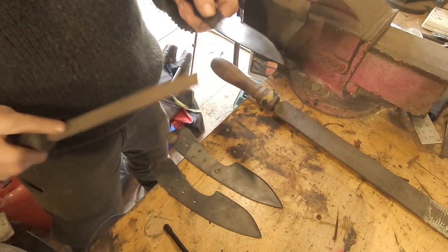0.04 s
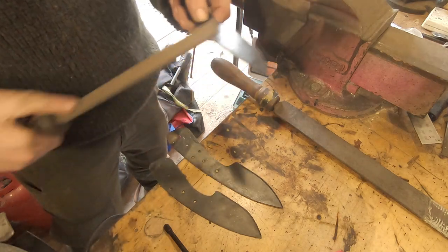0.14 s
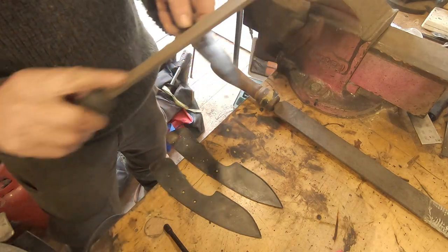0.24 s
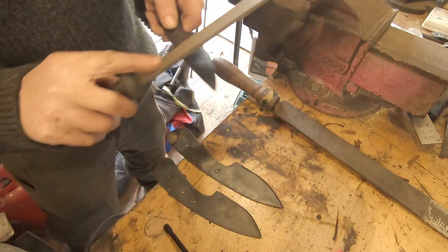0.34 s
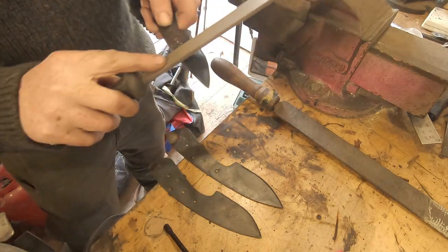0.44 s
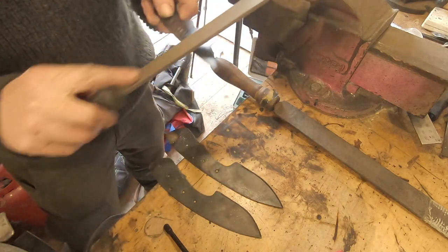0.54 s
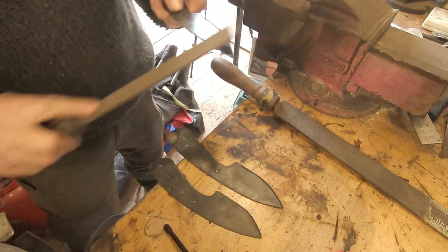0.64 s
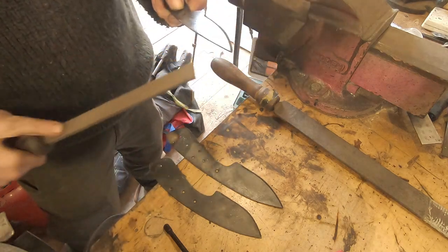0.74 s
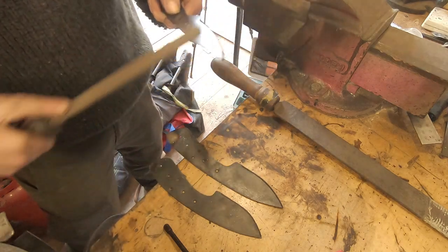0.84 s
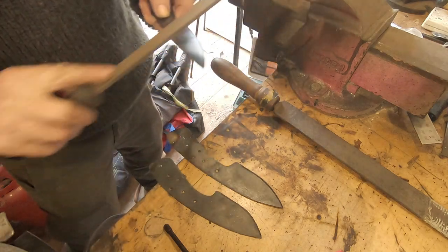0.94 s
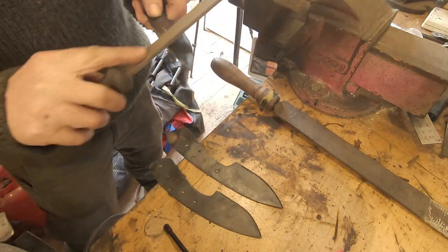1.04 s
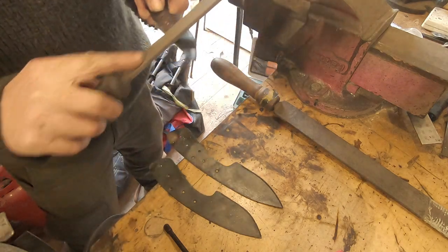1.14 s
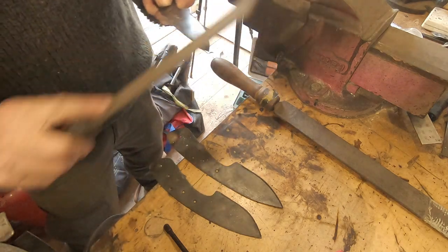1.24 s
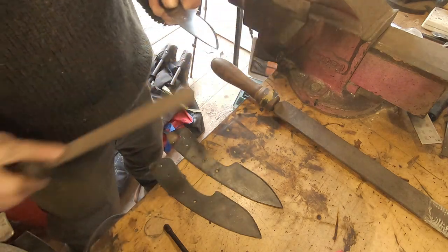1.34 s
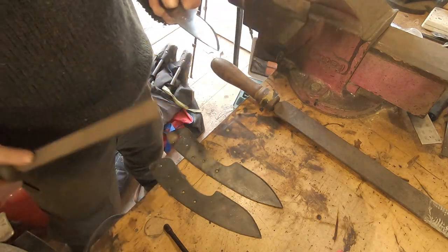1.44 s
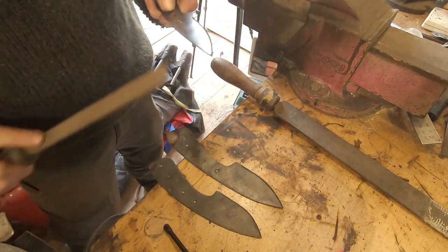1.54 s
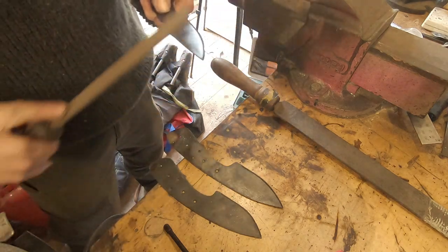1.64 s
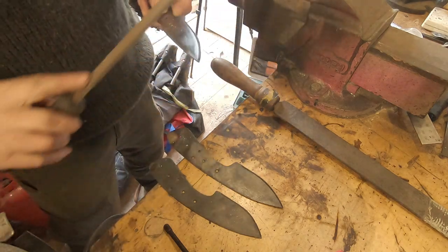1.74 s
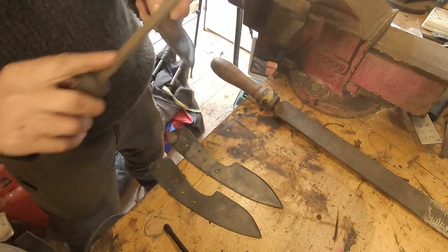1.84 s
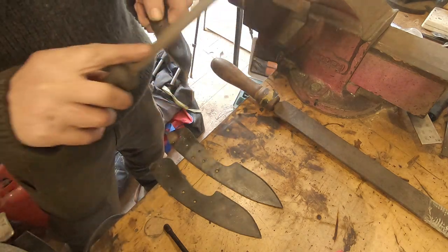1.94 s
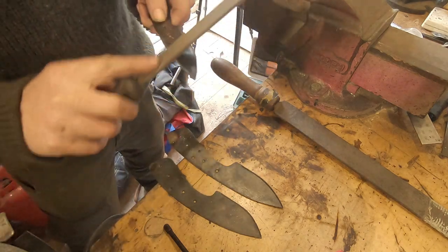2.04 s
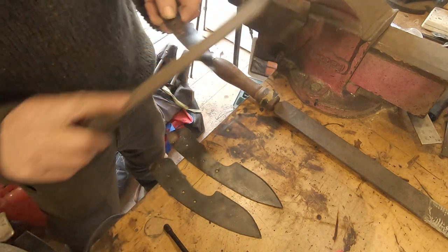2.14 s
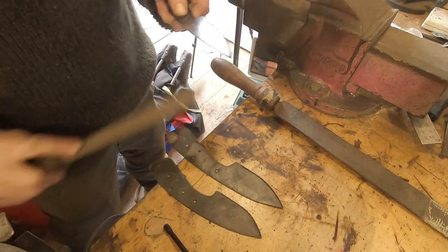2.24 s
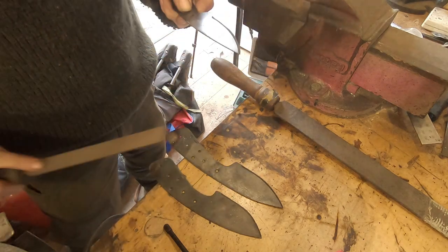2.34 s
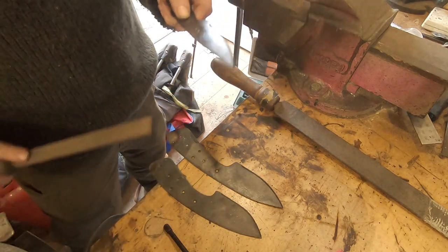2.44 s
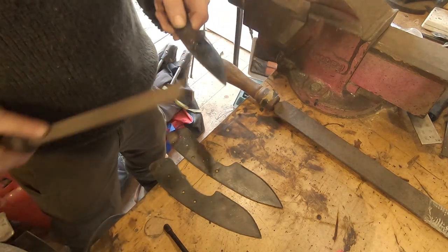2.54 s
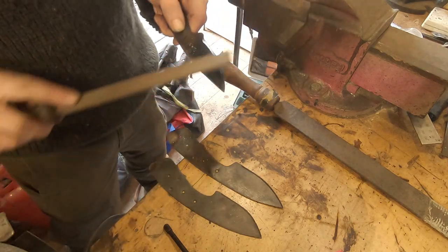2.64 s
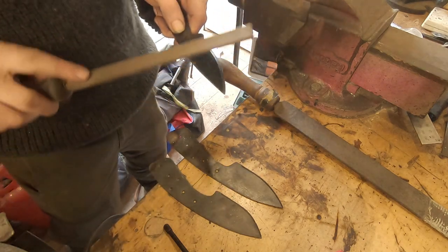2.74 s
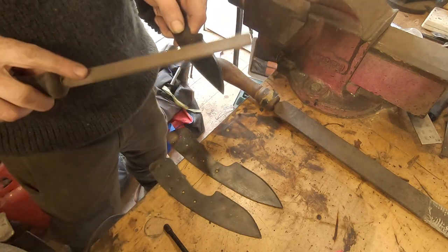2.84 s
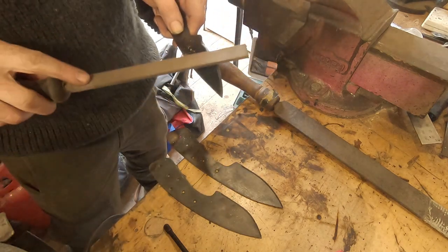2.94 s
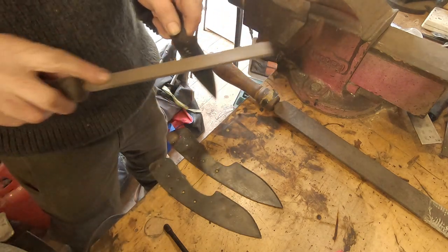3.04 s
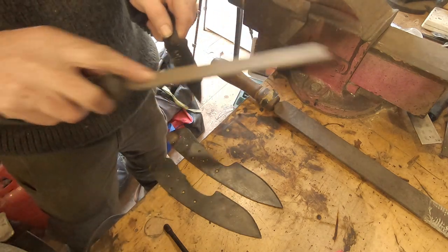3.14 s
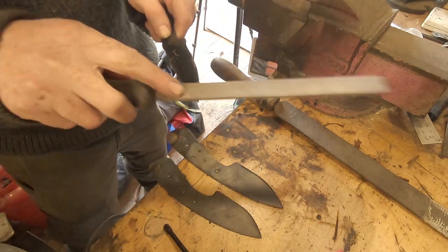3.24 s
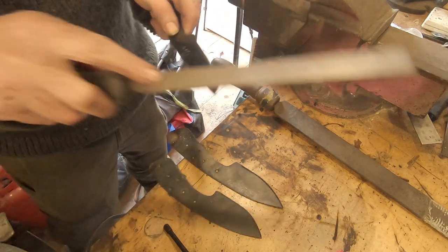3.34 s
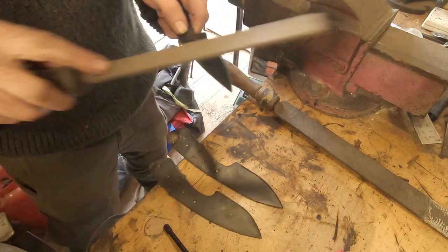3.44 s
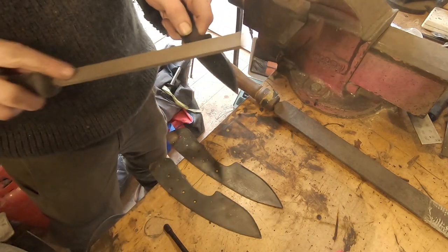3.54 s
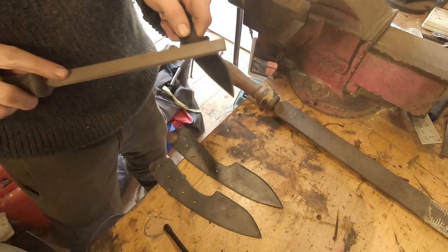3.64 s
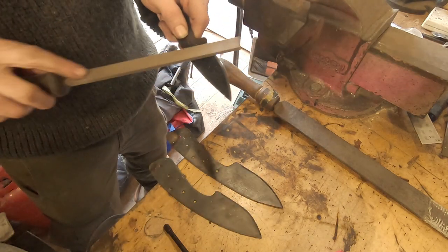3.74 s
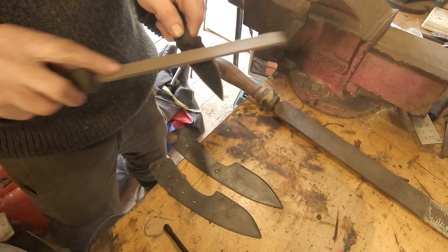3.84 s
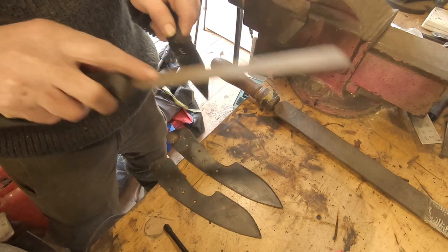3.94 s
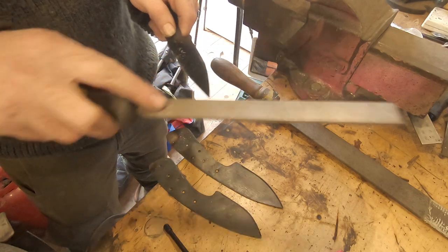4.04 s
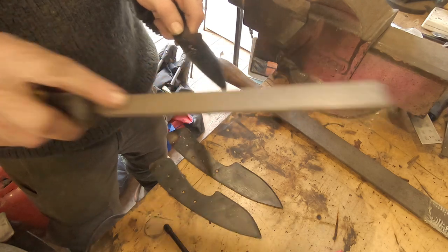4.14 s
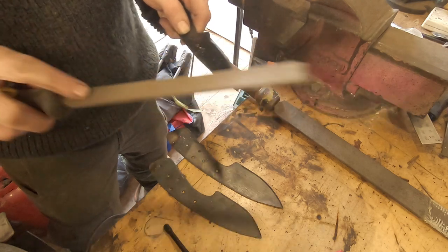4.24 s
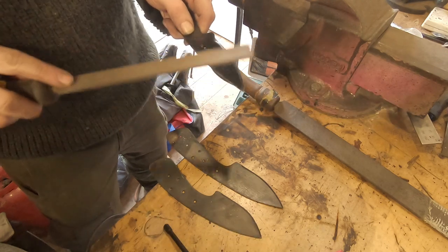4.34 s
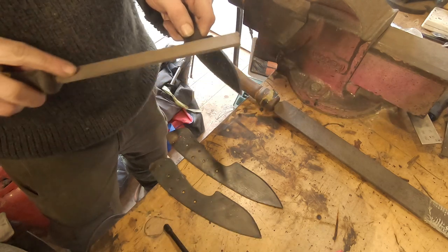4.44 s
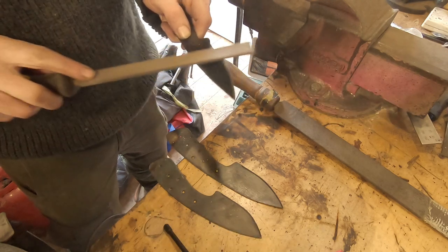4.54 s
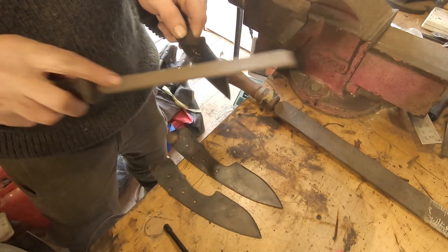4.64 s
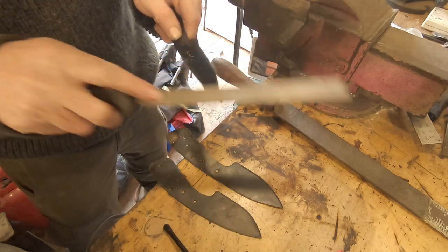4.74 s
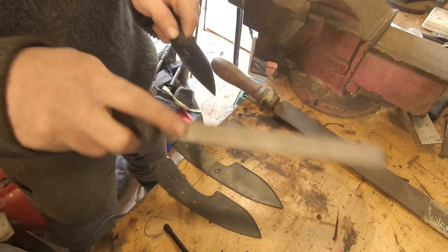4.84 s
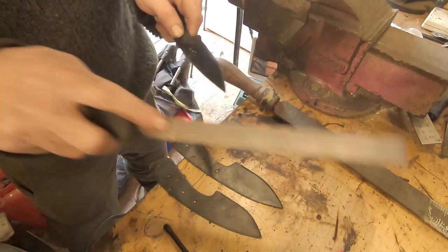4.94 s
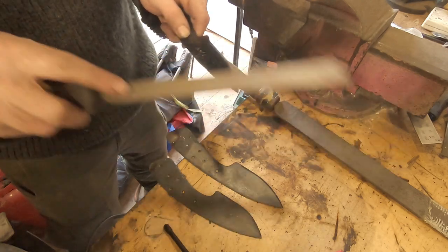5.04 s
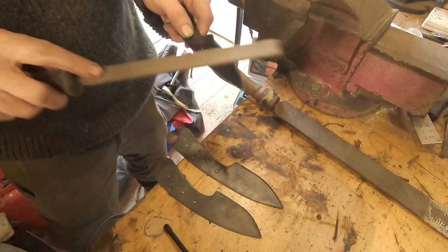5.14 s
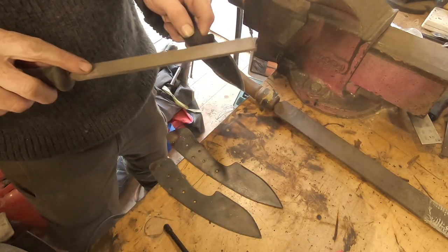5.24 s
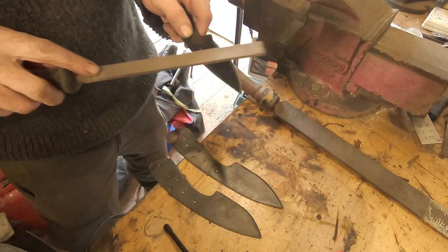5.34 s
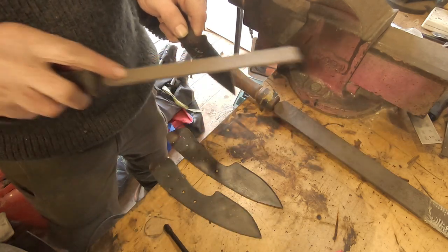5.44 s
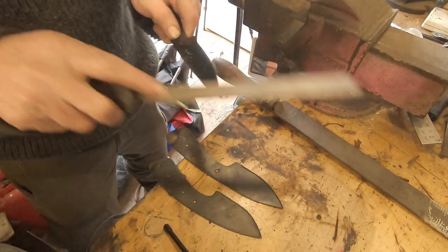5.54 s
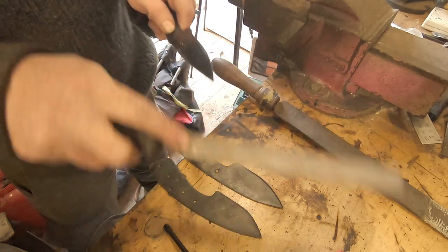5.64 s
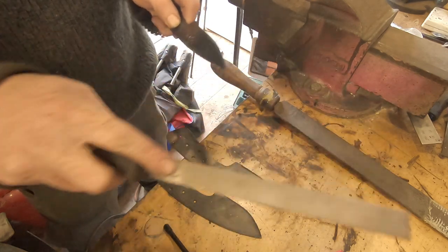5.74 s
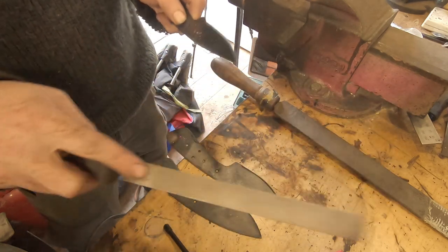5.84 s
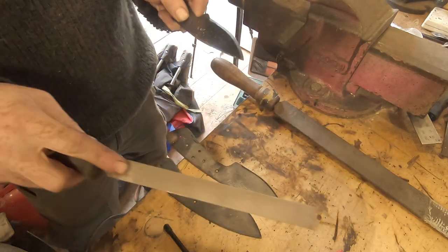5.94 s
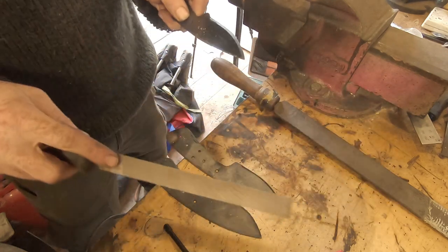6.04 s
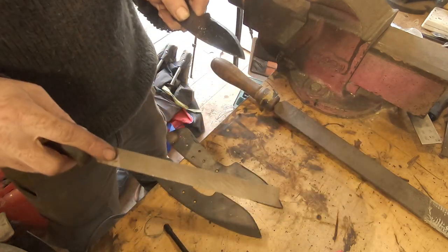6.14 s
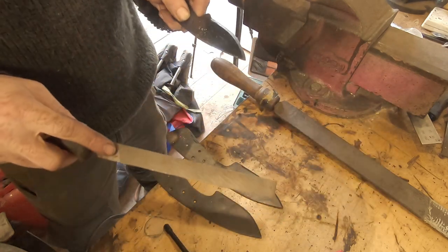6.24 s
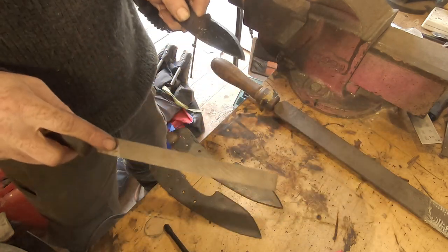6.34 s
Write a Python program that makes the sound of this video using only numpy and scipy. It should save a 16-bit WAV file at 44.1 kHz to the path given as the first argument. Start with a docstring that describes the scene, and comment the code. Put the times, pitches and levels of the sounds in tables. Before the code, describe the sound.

Short, ringing scrapes of a file on hard steel repeat steadily, most beginning with a tick, over a faint workshop hum.

```python
"""Filing a steel blade

A hand file is pushed seven times across a hard blade held over a workbench. It lands with a tick,
gathers speed and lifts off; its teeth chatter and snag, driving the steel's modes in forced vibration.
After three pushes the blade is turned and sounds darker. A small, dry workshop hums quietly behind."""
import sys
import numpy as np
from scipy import signal
from scipy.fft import rfft, irfft, next_fast_len
from scipy.io import wavfile
from scipy.ndimage import uniform_filter1d

SR = 44100
rng = np.random.default_rng(int(sys.argv[2]) if len(sys.argv) > 2 else 0)


def store_wav(level_fs):
    """Save 16-bit WAV to argv[1]."""
    pcm = np.round(np.clip(np.atleast_2d(level_fs), -1, 1) * 32767)
    wavfile.write(sys.argv[1], SR, pcm.T.astype(np.int16))


N = 281247
TURN_S = 2.6  # the blade is turned over
TAPS = 8192
GRID = np.fft.rfftfreq(TAPS, 1 / SR)  # f/Hz on which responses are drawn


def gain_of(db):
    """Amplitude ratio of a level in decibels."""
    return 10 ** (np.asarray(db) / 20)


def unit_rms(x):
    """Normalisation to unit mean power."""
    return x / np.sqrt(np.mean(x ** 2) + 1e-20)


def curve_at(points, hz):
    """Interpolation of (f/Hz, value) points on a logarithmic frequency axis."""
    f, value = np.transpose(points)
    return np.interp(np.log(hz + 1), np.log(f + 1), value)


def ramp(t, start, end):
    """Linear rise from 0 at start to 1 at end."""
    return np.clip((t - start) / max(end - start, 1e-4), 0, 1)


def add(mix, s, sound):
    """Superposition: the sound joins the mix at s seconds."""
    part = mix[max(round(s * SR), 0):][:len(sound)]
    part += sound[:len(part)]


def wander(length, hz):
    """Random modulation: noise of about unit rms, low-passed at hz."""
    f = np.fft.rfftfreq(N, 1 / SR)
    spectrum = rfft(rng.standard_normal(N)) / (1 + (f / hz) ** 4)
    return unit_rms(irfft(spectrum, N))[:length]


def minimum_phase(gain):
    """Minimum-phase impulse response of a gain curve on GRID, its peak gain scaled to 1."""
    log_gain = np.log(np.maximum(gain / gain.max(), 1e-5))
    mirrored = np.concatenate([log_gain, log_gain[-2:0:-1]])
    spectrum = np.exp(np.conj(signal.hilbert(mirrored)))
    return irfft(spectrum[:len(GRID)])[:TAPS // 2]


def through(x, response):
    """Convolution, cut to the length of the input."""
    return signal.fftconvolve(x, response)[:len(x)]


def split(x):
    """Complementary crossover: the ring below 4 kHz and the bite above."""
    x = np.pad(x, (40, 0))
    ring = signal.sosfiltfilt(signal.butter(4, 4000, fs=SR, output="sos"), x, padtype=None)
    return ring, x - ring


def background(level_db=-68, side_db=-8, swell_db=1):
    """Ambient noise: a low murmur with faint hiss, largely coherent between left and right."""
    # f/Hz, relative spectral density/dB
    noise_floor = [(12, -38.5), (20, -8), (40, -11.5), (112, -26), (144, -6), (207, -2.5), (324, -13),
                   (372, -15.5), (581, -21), (686, -15.5), (932, -19), (1040, -24.5), (1230, -21),
                   (2330, -33), (15500, -46)]
    colour = gain_of(curve_at(noise_floor, np.fft.rfftfreq(N, 1 / SR)))
    mid, side = unit_rms(irfft(rfft(rng.standard_normal((2, N))) * colour, N))
    side = side * gain_of(side_db)
    return np.array([mid + side, mid - side]) * gain_of(level_db + swell_db * wander(N, 4))


def tooth_rate(t, fastest, lift, top_hz, lift_hz, start_hz=1095):
    """Tooth-passing frequency follows the arm's speed: a late rise to top_hz, then a glide to lift_hz."""
    rising = np.sin(np.pi / 2 * ramp(t, t[0], fastest)) ** 3
    braking = ramp(t, fastest, lift) ** 1.5
    return (start_hz + (top_hz - start_hz) * rising) * (lift_hz / top_hz) ** braking


def snags(t):
    """Unsteady friction: each grab of the teeth shifts ring, bite and chatter by a Gaussian pulse in dB."""
    # t/s, duration/s, ring/dB, bite/dB, chatter/dB
    grabs = [(0.622, 0.037, -1.5, 3.5, 5), (0.666, 0.024, 2.5, 1, -1), (0.728, 0.015, 1, -2.5, 8.5),
             (1.223, 0.017, -1, 3.5, 0.5), (1.246, 0.013, 3, -1.5, 14), (2.136, 0.025, -0.5, 1, 1),
             (2.2, .030, -1, 1, 8.5), (2.252, 0.013, 8, -0.5, -0.5), (3.837, 0.044, 2.5, -3.5, 13.5),
             (3.979, 0.0084, 3.5, 4, 6.5), (4.022, 0.0146, -8, 14.5, 0), (4.719, .030, -0.5, -8, -1),
             (4.767, 0.026, -1, 3, 0.5), (4.838, 0.014, 4, 6.5, 1), (5.457, 0.026, 0.5, 4, 1),
             (5.573, 0.045, 0.5, 9.5, 2), (5.622, 0.01, -1, 5.5, 9)]
    return sum(np.outer(change_db, np.exp(-(2 * (t - s) / length) ** 2)) for s, length, *change_db in grabs)


def teeth(t, hz, chatter_db, jitter=.055, db_per_octave=-6.5, chips_per_s=9000):
    """Contact force: uneven tooth rows give a jittered harmonic series, breaking chips give shot noise."""
    cycles = np.cumsum(hz * (1 + jitter * wander(len(t), 480))) / SR
    rows = sum(gain_of(db_per_octave * np.log2(k)) * np.cos(2 * np.pi * k * cycles) * (k * hz < SR / 2)
               for k in range(1, 7))
    chip_sizes = gain_of(np.minimum(rng.exponential(1, len(t)), 3))
    chips = chip_sizes * rng.standard_normal(len(t)) * (rng.random(len(t)) < chips_per_s / SR)
    force = unit_rms(rows) * gain_of(chatter_db) / 2 + unit_rms(chips)
    judder = gain_of(-0.24 * wander(len(t), 110))
    return force * judder


def mode_ripple(ripple_db, spacing_hz):
    """Modal overlap: many weak modes make a random ripple in dB over GRID."""
    knots = np.arange(0, SR, spacing_hz)
    return ripple_db * np.interp(GRID, knots, rng.standard_normal(2048)[:len(knots)])


def low_ring(db, centre_hz=1550, octaves=.55):
    """Damping by the fingers varies from push to push: a broad rise or dip in dB over GRID."""
    return db * np.exp(-(np.log2((GRID + 1) / centre_hz) / octaves) ** 2)


def steel(s, main_hz=2850, ripple_db=0, grip_t60=.105):
    """Modal response to one tooth: the contact point moves the main resonance, and the others less."""
    # resonances of blade and file, before and after the turn: f/Hz, width/Hz, level/dB
    modes_first = [(2163, 17, -8), (2340, 64, -11.5), (2811, 155, 0.5), (3645, 47, -10.5), (4500, 7.6, -12),
                   (5124, 170, -5), (6630, 47, -4.5), (7100, 78, -13), (8010, 43, -13), (9660, 72, -14),
                   (9600, 150, -19), (10100, 21, -17)]
    modes_turned = [(1820, 11.7, -13), (2200, 24, -8), (2848, 158, -4.5), (3555, 25, -10),
                    (3797, 49.8, -14.5), (4247, 26, -19), (4820, 82, -13.5), (5120, 130, -9.5),
                    (6685, 145, -11)]
    # the dense, damped ring between them: f/Hz, level/dB
    body_first = [(180, -68), (300, -42.5), (892, -32), (1370, -16.5), (2250, -5.5), (2740, -5),
                  (3340, -14.5), (5130, -9), (5760, -14.5), (6460, -7), (7370, -16), (9450, -13),
                  (10800, -24), (14300, -36), (15500, -49)]
    body_turned = [(180, -78.5), (300, -46), (610, -39), (1220, -34), (2040, -6), (2400, -13.5),
                   (2880, -18), (3400, -19.5), (4490, -17), (5130, -12), (5660, -16.5), (6790, -12.5),
                   (7500, -16.5), (10100, -19.5), (15500, -49.5)]
    modes, body, body_db = (modes_first, body_first, -4) if s < TURN_S else (modes_turned, body_turned, -5)
    shift = main_hz / 2830
    peak_power = sum(gain_of(db) ** 2 / (1 + ((GRID / shift ** .11 - hz) / width) ** 2) ** 2
                     for hz, width, db in modes)
    peak_power += gain_of(-5) ** 2 / (1 + ((GRID - main_hz) / 165) ** 2) ** 2
    dense = np.interp(GRID / shift ** .49, GRID, gain_of(curve_at(body, GRID) + body_db + ripple_db))
    radiation = GRID ** 2 / (GRID ** 2 + 520 ** 2)  # thin steel radiates little bass
    grip = gain_of(-60 * np.arange(TAPS // 2) / SR / grip_t60)  # the fingers damp the ring
    return minimum_phase(np.sqrt(peak_power + dense ** 2) * radiation) * grip


def sliding(force, t, main_hz, low_db, hop=1400):
    """Moving excitation: the contact crosses nodes and antinodes, so the steel's response keeps changing."""
    steady_db = mode_ripple(ripple_db=3, spacing_hz=170) + low_ring(low_db)
    samples = np.arange(len(force))
    sound = 0
    for centre in range(0, len(force) + hop, hop):
        crossfade = np.maximum(1 - abs(samples - centre) / hop, 0)
        nodes_db = mode_ripple(ripple_db=4.5, spacing_hz=450)
        response = steel(t[0], np.interp(centre, samples, main_hz), steady_db + nodes_db)
        sound = sound + signal.fftconvolve(force * crossfade, response)
    return sound


def flex(s):
    """Flexural vibration: the low impulse response of the hand-held blade, at unit energy."""
    # bending spectrum before and after the turn: f/Hz, level/dB
    bending_first = [(30, -23), (90, -12), (150, -1), (240, 2.5), (400, -7.5), (650, -3), (1100, -0.5),
                     (1800, -12.5), (4000, -40)]
    bending_turned = [(30, -23.5), (90, -9), (150, -9.5), (240, -3.5), (400, -10.5), (620, 4.5), (1000, -6),
                      (1800, 4), (4000, -36)]
    response = minimum_phase(gain_of(curve_at(bending_first if s < TURN_S else bending_turned, GRID)))
    return response / np.linalg.norm(response)


def thrum(t, pressure_db, hz):
    """Random forcing bends the blade, most when the file presses hard and moves slowly."""
    force_db = -50.5 + .32 * pressure_db - 6 * np.log2(hz / 1500)
    return signal.fftconvolve(rng.standard_normal(len(t)) * gain_of(force_db), flex(t[0]))


def stroke(catch, dig, dig_s, fastest, lift, catch_db, full_db, lift_db, treble_db,
           top_hz, lift_hz, chatter_db, first_ring_hz, last_ring_hz, low_db):
    """Forced vibration during one push: pressure sets the level of the ring, speed its treble."""
    t = np.arange(catch, lift, 1 / SR)
    hz = tooth_rate(t, fastest, lift, top_hz, lift_hz)
    wobble_hz = 70 * wander(len(t), 25)  # the contact point wobbles
    main_hz = np.linspace(first_ring_hz, last_ring_hz, len(t)) + wobble_hz
    skating = 1 - ramp(t, dig, dig + dig_s)  # light, bright contact until the teeth dig in
    settling = 1 - np.exp(-(t - catch) / .03)
    skating_db = catch_db + (max(full_db - 7.5, catch_db) - catch_db) * settling
    easing_db = (lift_db - full_db) * ramp(t, fastest, lift) ** 2.2
    pressure_db = skating * skating_db + (1 - skating) * full_db + easing_db
    bite_db = treble_db + 6.5 * np.log2(np.minimum(hz / 2140, 1)) + 3 * skating
    locking_db = 11.5 * (ramp(t, catch, lift) - .5)  # the teeth fall into step over a push
    snag_ring, snag_bite, snag_chatter = snags(t)
    force = teeth(t, hz, chatter_db + locking_db + snag_chatter)
    ring, bite = split(sliding(force, t, main_hz, low_db))
    sound = 0
    for band, db in (ring, pressure_db + snag_ring), (bite, pressure_db + bite_db + snag_bite):
        power = uniform_filter1d(band[:len(t)] ** 2, size=1000)
        gain = gain_of(db) / np.sqrt(abs(power) + 1e-12)
        sound = sound + band * np.pad(gain, (0, len(band) - len(t)), "edge")  # free decay after lift-off
    add(sound, 0, thrum(t, pressure_db, hz))
    return catch, sound


def singing(x):
    """Resonance: blade and file ring on in a few lightly damped modes."""
    # f/Hz, gain at resonance/dB, t60/s
    modes = [(2250, -22, .2), (2470, -23, .38), (2751, -22, .09), (2960, -25, .08), (4341, -23, .1),
             (5017, -24, .1), (6464, -20, .1), (6939, -22, .1)]
    t = np.arange(SR // 2) / SR
    response = sum(gain_of(db - 60 * t / t60) * np.cos(2 * np.pi * hz * t) * 2 * np.log(1000) / (t60 * SR)
                   for hz, db, t60 in modes)
    return through(x, response)


def direct_sound(x):
    """Near field: the steel reaches left and right with different level and phase."""
    # left minus right: f/Hz, level/dB
    balance = [(60, -0.5), (120, -2), (240, 0.5), (480, -1.5), (950, 4.5), (1890, 2.5), (3770, 3.0),
               (7520, -3), (15000, 0.5)]
    # lead of the left channel: f/Hz, phase/rad
    lead = [(500, 0.27), (1500, -1.72), (2300, -.5), (3300, -0.57), (4800, .5), (6500, 0.31), (8400, 1.75),
            (9800, 1.3), (11200, 2.5), (14000, 0.25)]
    size = next_fast_len(N + TAPS)
    hz = np.fft.rfftfreq(size, 1 / SR)
    left = gain_of(curve_at(balance, hz) / 2) * np.exp(.5j * curve_at(lead, hz))
    return irfft(rfft(x, size) * np.array([left, 1 / left]), size)[:, :N]


def scatter(x, t60=.017, drift_hz=5, paths=3):
    """Early scattering off moving hands, vice and bench: drifting paths, in antiphase left and right."""
    # f/Hz, level/dB
    strength = [(500, -8), (1500, -11.5), (2800, -16), (5000, -8), (8000, -5), (13000, -5.5)]
    t = np.arange(TAPS // 4) / SR
    weights = np.array([wander(N, drift_hz) for _ in range(paths)])
    side = 0
    for weight in weights / np.linalg.norm(weights, axis=0):
        echoes = rng.standard_normal(len(t)) * gain_of(-60 * t / t60)
        spectrum = rfft(echoes / np.linalg.norm(echoes), TAPS) * gain_of(curve_at(strength, GRID))
        side = side + through(x * weight, irfft(spectrum)[:len(t)])
    return np.array([side, -side])


def workshop(x, first_echo_s=.004):
    """Reverberation: dense echoes from bench and walls, each band decaying at its own rate."""
    # f/Hz, t60/s
    decay_times = [(300, .2), (1200, .16), (1900, .16), (2400, .19), (3200, .15), (9000, .15), (15000, .11)]
    echoes = rng.standard_normal((2, SR // 2)) * (rng.random((2, SR // 2)) < .1)
    echoes *= np.arange(SR // 2) / SR > first_echo_s
    hz, t, bands = signal.stft(echoes, SR, nperseg=256)
    decay = gain_of(-60 * t / curve_at(decay_times, hz)[:, None])
    tail = signal.istft(bands * decay, SR, nperseg=256)[1]
    return signal.fftconvolve(x[None], tail / np.linalg.norm(tail[0]), axes=1)[:, :N]


def graze(s, db, hz, t60):
    """Brief, light contact of file and blade: a broad band of noise in exponential decay."""
    t = np.arange(SR // 4) / SR
    colour = minimum_phase((GRID / hz) ** 2 / (1 + (GRID / hz) ** 8))
    noise = unit_rms(through(rng.standard_normal(len(t)), colour))
    return s, gain_of(db - 60 * t / t60) * noise


def landing(s, db, bite_db, skid_t60=.012, knock_db=-24):
    """Impact excitation: the file lands with one hard blow, a short skid and a soft flexural knock."""
    t = np.arange(TAPS // 2) / SR
    force = .28 * rng.standard_normal(len(t)) * gain_of(-60 * t / skid_t60)
    force[0] = 1  # the blow
    ring, bite = split(through(force, steel(s)))
    tick = ring + gain_of(bite_db + 1) * bite
    tick = tick / np.linalg.norm(tick)
    add(tick, 0, gain_of(knock_db) * flex(s))
    return s, gain_of(db) * tick


def scene(room_db=-11):
    """Superposition of strokes, grazes and landings with their reflections and the ambient noise."""
    # seven pushes and two brief scrapes: catch t/s, dig t/s, dig duration/s, fastest t/s, lift t/s,
    # catch level/dB, full level/dB, lift level/dB, treble/dB, top tooth f/Hz, lift tooth f/Hz,
    # chatter/dB, main resonance at catch f/Hz and at lift f/Hz, low ring/dB
    strokes = [ (0.0, 0.001, 0.002, 0.0043, 0.022, -23.5, -30.5, -43.5, -5, 1943, 1914, -5.5, 2754, 2770, -0.5),
               (0.482, 0.515, 0.007, 0.67, 0.737, -43, -25.5, -27.5, 0.5, 2501, 1005, -10.5, 3050, 2595, -1.5),
               (1.067, 1.071, 0.0041, 1.062, 1.125, -35, -33, -52, -0.5, 1143, 1098, -12, 2780, 2830, 2),
               (1.137, 1.179, 0.06, 1.330, 1.356, -43, -24.5, -26.5, 2, 4220, 4300, -9, 2824, 2970, -2.5),
               (2.063, 2.077, 0.036, 2.16, 2.270, -44, -25, -27, 2.5, 3719, 2700, -7.5, 2660, 2750, 5),
               (3.024, 3.1, 0.028, 3.16, 3.260, -56.5, -24, -41, -1.5, 1571, 1008, -3, 2920, 2860, 0),
               (3.731, 3.816, 0.010, 3.920, 4.036, -47, -24, -36, -3, 2003, 847.5, -4.5, 3090, 2716, 0.5),
               (4.564, 4.634, 0.043, 4.750, 4.847, -39, -25, -28, -3.5, 2108, 1607, -21.5, 2918, 2833, -1.5),
               (5.336, 5.433, 0.013, 5.78, 5.633, -47, -24.5, -26, -4, 2050, 2100, -13, 2890, 2840, 2), ]
    # t/s, level/dB, centre f/Hz, t60/s
    grazes = [(.287, -68, 5000, .2), (.398, -70, 5000, .2), (.525, -57, 280, .25),
              (1.747, -53.5, 1400, .17), (1.747, -61, 230, .3), (3.33, -69, 3300, .45)]
    # t/s, energy level/dB, treble/dB
    landings = [(0.4397, -17, -0.5), (0.465, -25, -6.5), (1.066, -17.5, -2.5), (2.0225, -3, 4),
                (2.935, -3, 3.5), (3.7224, -6.5, -1), (4.556, -1, 2.5), (5.3096, -10.5, -2.5)]
    filing = np.zeros(N)
    for source, events in (stroke, strokes), (landing, landings), (graze, grazes):
        for event in events:
            add(filing, *source(*event))
    filing = filing + singing(filing)
    return direct_sound(filing) + scatter(filing) + gain_of(room_db) * workshop(filing) + background()


def record(dry):
    """Band limiting: a linear-phase low-pass at 15.4 kHz."""
    low_pass = signal.firwin(511, 15400, window=("kaiser", 9), fs=SR)
    return signal.oaconvolve(dry, low_pass[None], "same")


dry = scene()
out = record(dry)
store_wav(out)
```